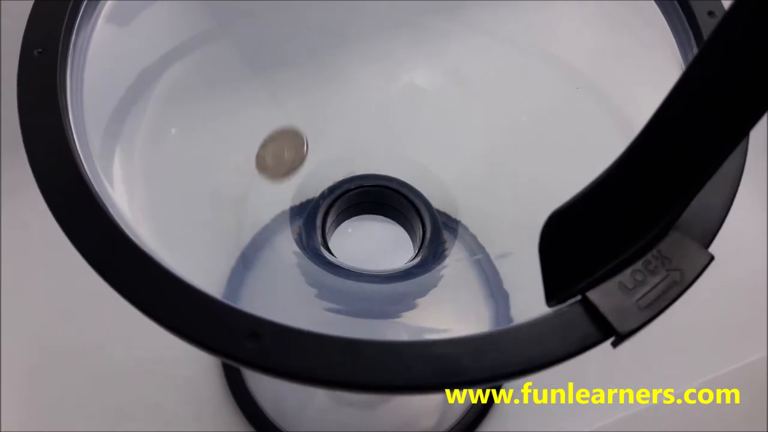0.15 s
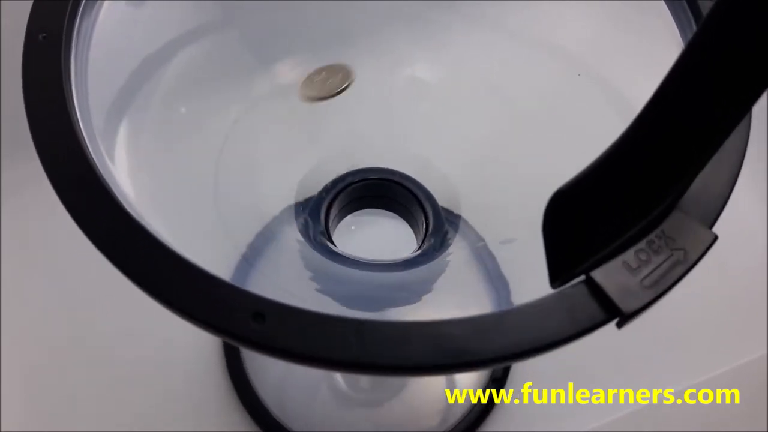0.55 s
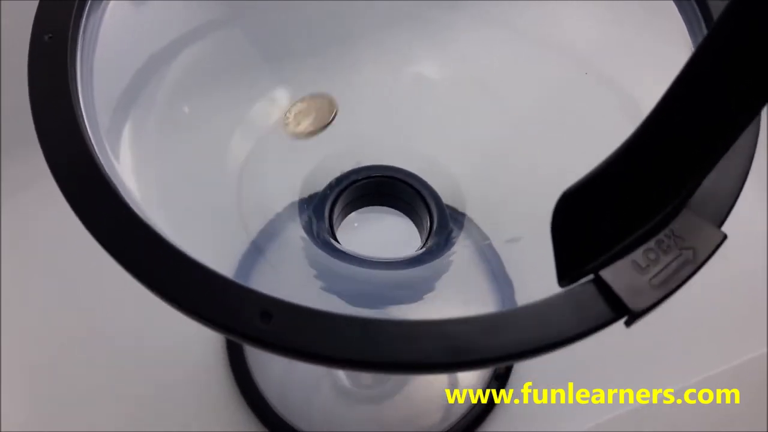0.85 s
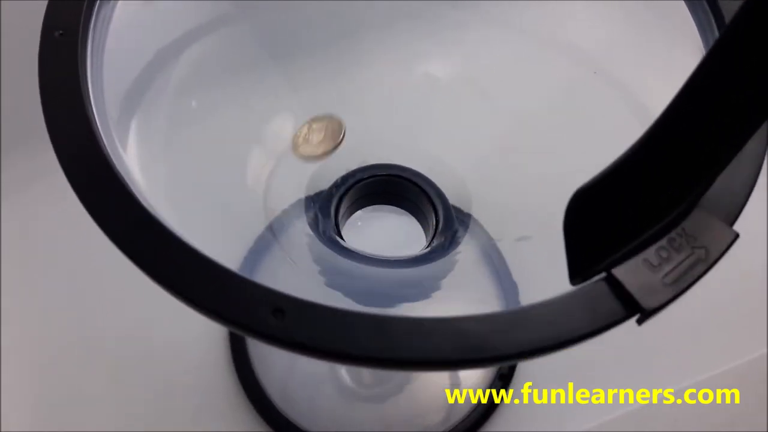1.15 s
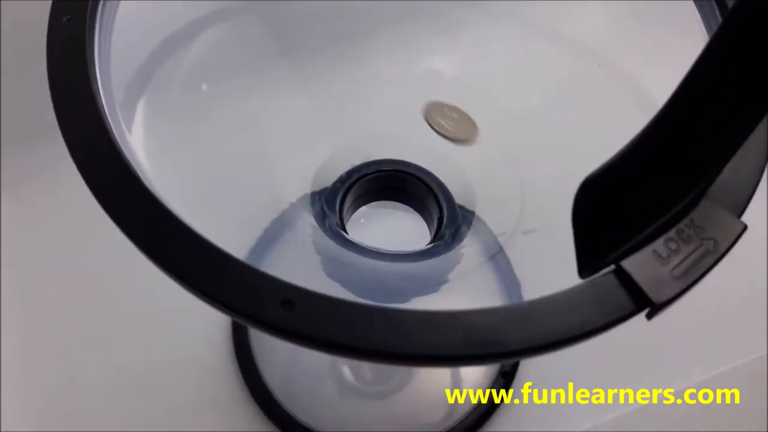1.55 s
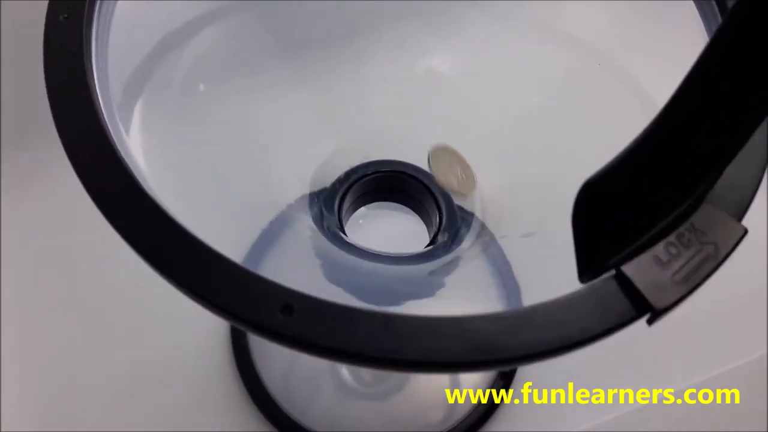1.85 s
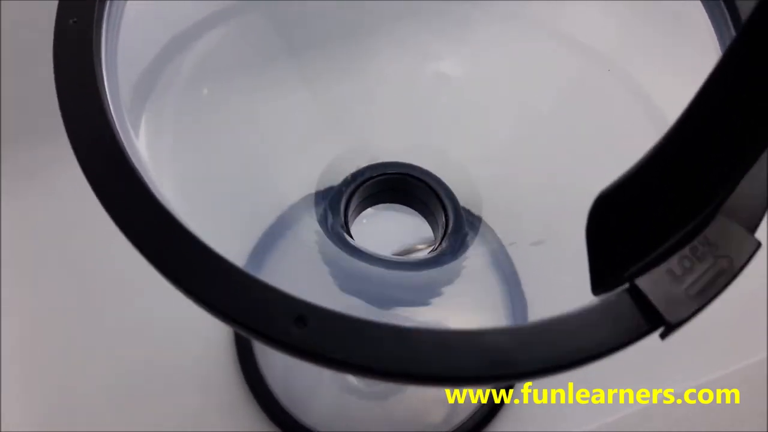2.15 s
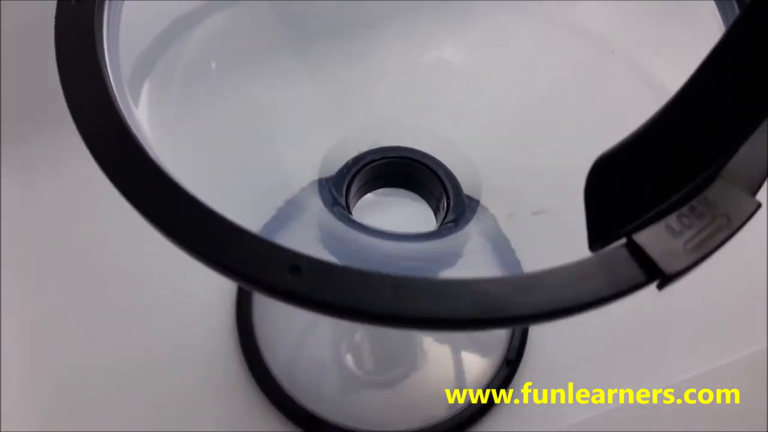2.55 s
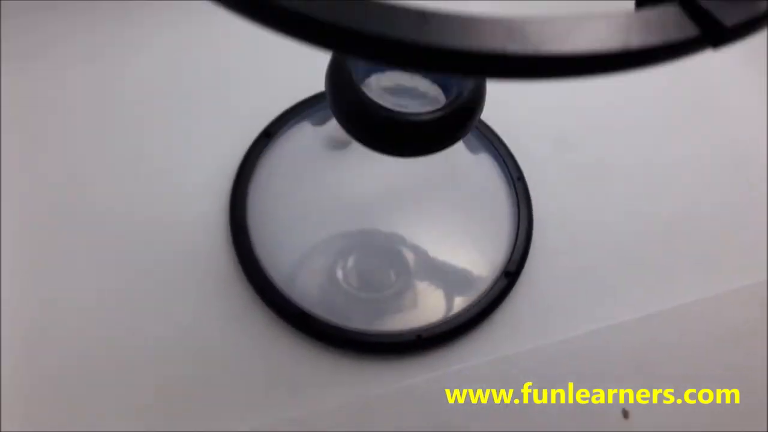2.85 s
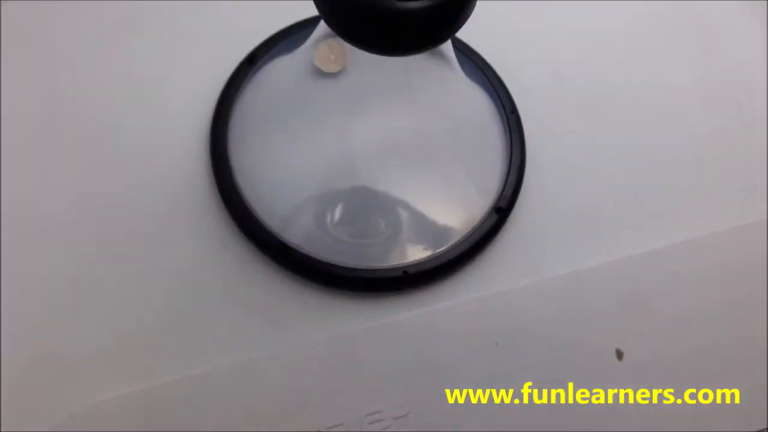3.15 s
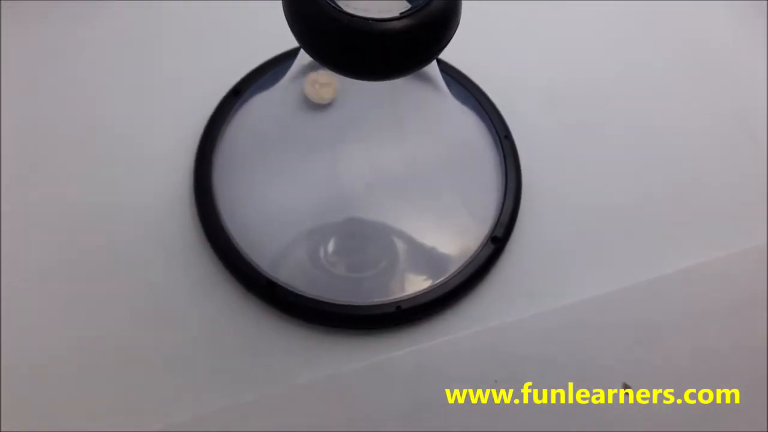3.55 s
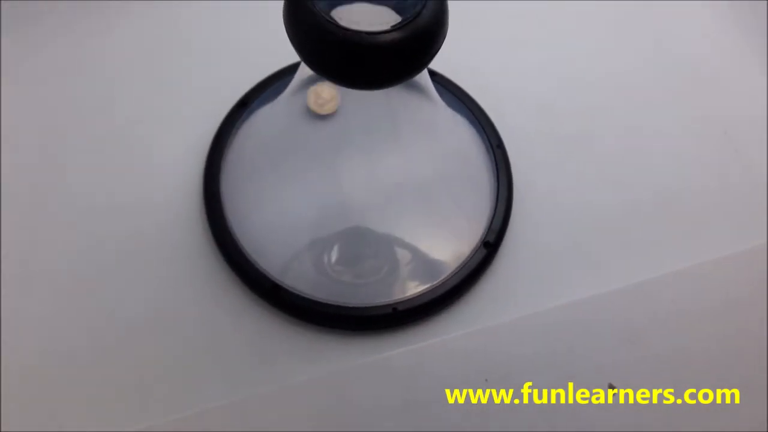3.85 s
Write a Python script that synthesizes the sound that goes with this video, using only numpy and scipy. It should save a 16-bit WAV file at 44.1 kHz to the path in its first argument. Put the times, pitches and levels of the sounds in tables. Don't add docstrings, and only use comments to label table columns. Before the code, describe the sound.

A coin rolls round a plastic funnel with a steady, gritty, ticking whirr, rattles sharply through the throat, clacks onto a hollow base and wobbles quietly; close stereo microphone in a small room with faint hum.

```python
import sys
import numpy as np
from scipy import signal
from scipy.fft import rfft, irfft, next_fast_len
from scipy.io import wavfile
from scipy.ndimage import uniform_filter1d, map_coordinates

SR = 44100
rng = np.random.default_rng(int(sys.argv[2]) if len(sys.argv) > 2 else 0)


def transcribe(u):
    v = np.clip(np.atleast_2d(u).T, -1, 1)
    q = np.round(v * 32767).astype(np.int16)
    wavfile.write(sys.argv[1], SR, q)


def natural_amplitude(level_db):
    exponent = np.asarray(level_db, float) / 20
    return 10 ** exponent


N = 176400
T = np.arange(N) / SR


def unit(x):
    return x / np.sqrt(np.mean(x ** 2) + 1e-20)


def along(points, hz):
    f, v = np.transpose(points)
    return np.interp(np.log(hz + 1), np.log(f + 1), v)


def wander(rate_hz):
    knots = rng.standard_normal(int(N * rate_hz / SR) + 4)
    return map_coordinates(knots, [T * rate_hz])


def filtered(x, response):
    m = next_fast_len(N + SR // 2)
    return irfft(rfft(x, m) * response(np.fft.rfftfreq(m, 1 / SR)), m)[..., :N]


def shaped_noise(skin):
    return unit(filtered(rng.standard_normal(N), lambda f: natural_amplitude(along(skin, f))))


def tilted(x, treble_db):
    high = filtered(x, lambda f: 1 / (1 + (3200 / (f + 1)) ** 4))
    return x + (natural_amplitude(treble_db) - 1) * high


def burst(start_s, hold_s, t60_s):
    t = np.maximum(T - start_s, 0)
    return (1 - np.exp(-t / 0.00047)) * natural_amplitude(-60 * np.maximum(t - hold_s, 0) / t60_s)


def grit(knocks_hz, share):
    knocks = (rng.random(N) < knocks_hz / SR) * rng.standard_normal(N)
    return unit(rng.standard_normal(N) + np.clip(share, 0, .9) * unit(knocks))


def body(force, peaks, skin, skin_db, sway_db, sway_hz, trend, mid_s):
    out = natural_amplitude(skin_db) * filtered(force, lambda f: natural_amplitude(along(skin, f)))
    for c, w, db in peaks:
        sway = sway_db * (wander(sway_hz) + 1.04 * wander(7.01))
        fed_db = db + sway + along(trend, c) * (T - mid_s)
        mode = filtered(force, lambda f: (1j * f * w / (c * c - f * f + 1j * f * w)) ** 2)
        out = out + natural_amplitude(fed_db) * mode
    return out


# [t/s, level/dB]
GAIN = [
    (0, -55.5),
    (2.19, -53.5),
    (2.27, -56.5),
    (2.45, -68),
    (2.7, -63),
    (3.5, -65.5),
    (3.75, -57.5),
    (3.88, -54.5),
    (4, -56.5),
]
# [f/Hz, density/dB]
AIR = [(30, -16), (65, -12), (130, -8.5), (280, -6), (1000, -1), (4000, -17.5), (9000, -37), (16000, -37)]


def background():
    hum = np.sin(2 * np.pi * 49.5 * T)
    buzz = natural_amplitude(-1 + 2.1 * wander(17)) * np.sin(2 * np.pi * 105.2 * T + 2.9 * wander(8.7))
    tones = 2 ** .5 * (hum + buzz) * natural_amplitude([[-3.], [1.1]])
    noise = rng.standard_normal((3, N))
    air = unit(filtered(noise[0] + 0.63 * noise[1:], lambda f: natural_amplitude(along(AIR, f))))
    return natural_amplitude(np.interp(T, *np.transpose(GAIN))) * (tones + natural_amplitude(14.5) * air)


# [t/s, level/dB]
WOBBLE = [
    (2.44, -32),
    (2.518, -40),
    (2.538, -35),
    (2.556, -34),
    (2.58, -39.5),
    (2.615, -41.5),
    (2.634, -41.5),
    (3.378, -42.5),
    (4.0, -31),
]
# [f/Hz, width/Hz, level/dB]
BASE = [(292, 110, -6.5), (617, 410, -13), (777, 105, 2), (1000, 68, 1.5), (1636, 88, 1), (1930, 400, -7),
        (2290, 320, -1), (2580, 340, -9), (3400, 600, -49), (4100, 3700, -20.5)]
# [f/Hz, density/dB]
BASE_SKIN = [(88, -52), (150, -42), (270, -9.5), (391, -13), (759, -6.5), (1360, -6), (1690, 0),
             (2360, -4.5), (16000, -44.5)]
# [f/Hz, slope/(dB/s)]
BASE_TREND = [(300, 1), (800, -2), (1660, -2.5), (2600, 1.4)]


def wobbling():
    start_s, start_hz, quickens_hz_per_s = 2.611, 11.5, 3.2
    t = T - start_s
    turn = np.cos(2 * np.pi * (start_hz * t + quickens_hz_per_s * t * t / 2))
    depth_db = np.interp(T, [start_s, N / SR], [5.5, 0.3])
    force = natural_amplitude(2.3 * wander(110)) * grit(2500, 0.63)
    hum = unit(body(force, BASE, BASE_SKIN, 2.04, 2.2, 23.94, BASE_TREND, 4.04))
    level_db = np.interp(T, *np.transpose(WOBBLE)) + depth_db * turn + 1.0
    return natural_amplitude(level_db) * (T > WOBBLE[0][0]) * tilted(hum, 3.5 * turn - .7)


# [t/s, level/dB, t60/s, shell/dB, treble tilt/dB, snap/dB, snap f/Hz]
CLACKS = [
    (2.42, -18.5, 0.062, 7, 2, -6, 2310),
    (2.4285, -31, 0.18, 3, 11.5, -9, 1880),
    (2.5587, -31, 0.047, -33, 10, -12, 3480),
]
# [f/Hz, level/dB, t60/s]
SHELL = [(230, 5, .1), (213, -13, .17), (245, -14, .2), (180, -7, .05), (285, -4, .05), (480, -7, .08),
         (570, -6, .07), (780, -6, .05), (960, -9, .06), (1570, -9, .04), (1927, -9, .05)]
# [f/Hz, density/dB]
CLACK_SKIN = [(88, -66), (150, -9), (871, 4.5), (1190, -2), (2140, -0.5), (5680, -24.5), (7040, -25),
              (16000, -46.5)]


def clacks():
    out = np.zeros(N)
    for s, db, t60, shell_db, tilt_db, snap_db, snap_hz in CLACKS:
        t = np.maximum(T - s, 0)
        ring = sum(natural_amplitude(g - 60 * t / d) * np.sin(2 * np.pi * hz * t) for hz, g, d in SHELL)
        ring = ring * (1 - np.exp(-t / 0.0049))
        dulling_db = 250 * np.minimum(t, .04)
        crack = tilted(shaped_noise(CLACK_SKIN), tilt_db + 7.55 - dulling_db)
        out += natural_amplitude(db) * (natural_amplitude(shell_db) * ring + 2.11 * crack * burst(s, 0.003, t60))
        out += natural_amplitude(snap_db) * np.exp(-t / 0.001) * np.sin(2 * np.pi * snap_hz * t)
    return filtered(out, lambda f: (1j * f / (90 + 1j * f)) ** 2)


# [t/s, length/s, low mode/dB, high mode/dB]
RINGS = [
    (2.236, 0.05, -66, -58),
    (2.316, 0.11, -43, -46),
    (2.424, 0.1, -72, -55),
]
# [f/Hz, t60/s]
COIN = [(11740, .5), (12270, 0.82)]


def ringing():
    out = np.zeros(N)
    for s, length_s, *levels_db in RINGS:
        t = np.maximum(T - s, 0)
        free = np.clip(t / 0.014, 0, 1) * np.clip((length_s - t) / 0.026, 0, 1)
        for (hz, t60), db in zip(COIN, levels_db):
            level = natural_amplitude(db - 60 * t / t60 + 6.2 * wander(44.78))
            out += free * level * np.sin(2 * np.pi * hz * t + 0.6 * wander(130))
    return out


# [t/s, level/dB, treble tilt/dB]
TICKS = [(2.218, -10, 0), (2.2217, -3, 1), (2.224, -5.5, -4), (2.2271, -2, -7), (2.2315, -3, -16),
         (2.2364, -8, -13), (2.238, -16, -12), (2.2473, -24, -14), (2.2804, -6.5, 14), (2.282, -15, 5),
         (2.286, -8.5, -3), (2.2946, -13, -12), (2.3001, -16, 1), (2.304, -16, 2), (2.306, -19, -7)]
# [f/Hz, width/Hz, level/dB]
NECK = [(560, 120, -11), (1080, 41, -5), (1480, 66, -2), (1834, 82, 2), (1970, 100, 0), (2285, 69, -1),
        (2620, 77, -2.5), (2800, 160, -6.5), (3850, 180, -12), (4360, 300, -4.5), (4960, 500, -14),
        (6460, 700, -24), (12400, 3700, -31)]


def chatter():
    out, span = np.zeros(N + SR), np.arange(SR // 10) / SR
    spots_db = rng.normal(0, 4.7, (len(TICKS), len(NECK)))
    for (s, db, tilt_db), spot_db in zip(TICKS, spots_db):
        ring = np.zeros(len(span))
        for (c, w, g), d in zip(NECK, spot_db):
            push = natural_amplitude(g + d + tilt_db * (c > 3200)) * 2 * np.pi * w / SR
            ring += push * np.exp(-np.pi * w * span) * np.sin(2 * np.pi * c * span)
        out[round(s * SR):][:len(span)] += natural_amplitude(db + 21.5) * ring
    return filtered(out[:N], lambda f: (1j * f / (600 + 1j * f)) ** 3)


# [t/s, level/dB, hold/s, t60/s, treble tilt/dB]
SCRAPES = [
    (2.216, -18, 0.018, 0.038, 1),
    (2.2776, -20, 0.0047, 0.064, 11.5),
    (2.294, -20.5, 0.013, 0.088, 7.5),
]
# [f/Hz, density/dB]
THROAT = [(150, -50), (500, -16), (1100, -12.5), (1600, -13), (2150, 4.5), (2900, -7.5), (4600, -13.5),
          (16000, -38.5)]


def scrapes():
    stand_hz, stand_db, stand_t60_s = 153, -50.5, 0.94
    out = np.zeros(N)
    for s, db, hold, t60, tilt_db in SCRAPES:
        rasp = unit(filtered(grit(1500, 0.53), lambda f: natural_amplitude(along(THROAT, f))))
        rasp = tilted(rasp, tilt_db + 2.0 - 300 * np.clip(T - s, 0, .04))
        out += natural_amplitude(db + 2.4 * wander(350)) * burst(s, hold, t60) * rasp
        shake = np.sin(2 * np.pi * stand_hz * (T - s) + 3.5 * wander(30))
        out += natural_amplitude(stand_db) * burst(s, 0.029, stand_t60_s) * shake
    return out


# [t/s, peak/dB]
BUMPS = [(0.0149, -8), (0.0657, -19), (0.1521, -19), (0.2334, -16), (0.3651, -17), (0.4015, -11),
         (0.4165, -29), (0.4703, -15.5), (0.5142, -20.5), (0.5372, -11), (0.612, -7), (0.6983, -15),
         (0.7667, -27), (0.831, -7), (0.867, -4), (0.876, -13.5), (0.9078, -27), (0.918, -13),
         (0.9512, -7.5), (1.0091, -25.5), (1.048, -9), (1.0685, -12), (1.11, -8.5), (1.1628, -14),
         (1.2101, -18), (1.2286, -15), (1.248, -7), (1.3284, -9), (1.3598, -8), (1.5214, -12),
         (1.5569, -27), (1.5883, -20.5), (1.6117, -17), (1.6496, -15.5), (1.6626, -23), (1.697, -11),
         (1.7355, -18), (1.8472, -25), (1.897, -6), (1.9609, -9.5), (1.9734, -9), (2.0014, -14),
         (2.0996, -13), (2.172, -16)]


def bumps():
    rise_s, t60_s, over_db = 0.003, 0.049, 5
    kicks, span = np.zeros(N), np.arange(SR // 10) / SR
    for s, db in BUMPS:
        kicks[round((s - rise_s) * SR)] = natural_amplitude(db + over_db)
    pulse = (1 - np.exp(-span / rise_s)) * natural_amplitude(-60 * span / t60_s)
    return 1 + np.convolve(kicks, pulse)[:N]


# [t/s, force/dB, treble tilt/dB]
ROLL = [(0.0, -20, 2), (0.151, -21, -2), (0.15, -18.5, 0.5), (0.23, -23, 1), (0.27, -16.5, -2.5),
        (0.31, -24, 3.5), (0.37, -19.5, 2), (0.66, -22.5, 2.5), (1.14, -20.5, 1), (2.1, -21.5, 0.5),
        (2.12, -29, 4), (2.141, -17.5, 2), (2.149, -22, -6), (2.182, -18.5, 8.5), (2.209, -31, -22)]
# [f/Hz, width/Hz, level/dB]
CONE = [(1423, 60, -8), (482.6, 98, -6), (568, 97, -7), (765, 92, -12), (887, 167, -5.5), (1059, 98, 3),
        (1277, 154, -6), (1612, 56, -4), (1820, 176, -1), (1986, 130, 0.5), (2090, 168, 3),
        (2234, 117, -1.5), (2523, 260, -6.5), (4240, 1570, -17.5), (6250, 3000, -29.5)]
# [f/Hz, density/dB]
CONE_SKIN = [(88, -51), (150, -30), (649, -7), (888, -2), (1500, -3.5), (2020, 3.5), (2360, -5),
             (4320, -14), (16000, -37)]
# [f/Hz, slope/(dB/s)]
CONE_TREND = [(230, -6), (500, 2), (880, -5.5), (1040, 2.5), (1600, 2.5), (2030, -3), (4190, -0.7),
              (6000, -4.5)]


def rolling():
    s, db, tilt_db = np.transpose(ROLL)
    force = bumps() * natural_amplitude(0.52 * wander(30.2) + 1.0 * wander(200)) * grit(4000, 0.24)
    whirr = unit(body(force, CONE, CONE_SKIN, -0.39, 2.4, 21.99, CONE_TREND, 1.0))
    leaving = np.clip((s[-1] + 0.0031 - T) / 0.0093, 0, 1)
    return tilted(whirr, np.interp(T, s, tilt_db)) * natural_amplitude(np.interp(T, s, db)) * leaving


def patches(shape):
    field = uniform_filter1d(rng.standard_normal(shape), size=4, axis=1)
    return unit(uniform_filter1d(field, size=9, axis=2))


# [f/Hz, t60/s]
ROOM = [(200, 0.28), (2000, 0.27), (5000, 0.27), (10000, 0.031)]
# [f/Hz, level/dB]
WET = [(150, -16), (300, -11), (500, -6), (1000, -6), (4000, -14), (12000, 1.5)]
# [f/Hz, phase/rad]
DRIFT = [(200, 0.038), (500, 0.18), (1000, 1.05), (2000, 0.72), (5000, 1.3), (12000, 2.08)]


def heard(x, lean, lead, patchy_db, travel):
    hz, t, z = signal.stft(rng.standard_normal((2, SR // 2)), SR, nperseg=256)
    decay_db = along(WET, hz)[:, None] - 60 * t / along(ROOM, hz)[:, None]
    tail = signal.istft(z * natural_amplitude(decay_db), SR, nperseg=256)[1]
    wet = signal.fftconvolve(x[None], tail * 0.035, axes=1)[:, :N]
    side = np.array([[.5], [-.5]])
    ports = filtered(x, lambda f: np.exp(1j * side * along(lead, f)))
    hz, t, z = signal.stft(ports, SR, nperseg=256, noverlap=192)
    colour = natural_amplitude(patchy_db * (hz > 400)[:, None] * patches(z.shape))
    phase = travel * along(DRIFT, hz)[:, None] * patches(z.shape)
    direct = signal.istft(z * colour * np.exp(1j * phase), SR, nperseg=256, noverlap=192)[1][:, :N]
    return filtered(direct + wet, lambda f: natural_amplitude(side * along(lean, f)))


# [f/Hz, L-R/dB]
LEAN = [(60, -6), (110, 0), (200, -6), (380, -3.5), (700, -3.5), (1290, -4), (2380, -3.5), (4400, -8.5),
        (8120, -1), (15000, 6)]
# [f/Hz, phase/rad]
LEAD = [(100, 0.1), (600, 0.16), (1200, 0.81), (2500, 1.3), (5000, 1.86), (12000, 1.45)]
# [f/Hz, L-R/dB]
LEAN_LOW = [(60, -8), (110, -5), (200, -2.5), (380, -9), (700, -6.5), (1290, -5), (2380, -5.5),
            (4400, -7.5), (8120, -5.5), (15000, 17.5)]
# [f/Hz, phase/rad]
LEAD_LOW = [(100, 0.1), (600, 0.82), (1200, 1.3), (2500, 1.25), (5000, 2), (12000, 0.94)]


def scene():
    above = heard(rolling(), LEAN, LEAD, 1.05, 0.86)
    above = above + heard(scrapes() + chatter(), LEAN, LEAD, 0.66, 0.14)
    flight = ringing() * natural_amplitude([[1.2], [-1.2]])
    below = heard(clacks(), LEAN_LOW, LEAD_LOW, 1.1, 0.33)
    below = below + heard(wobbling(), LEAN_LOW, LEAD_LOW, 2.0, 0.76)
    return above + flight + below + background()


def top_cut(x):
    return signal.sosfilt(signal.butter(12, 16500, fs=SR, output="sos"), x)


def record(dry):
    ceiling, top_hz, wall_hz = .93, 15600, 16450
    held = dry / (1 + np.abs(dry / ceiling) ** 6) ** (1 / 6)
    mix = filtered(held, lambda f: (f < wall_hz) / (1 + (f / top_hz) ** 50) ** .5)
    return top_cut(mix)


dry = scene()
out = record(dry)
transcribe(out)
```